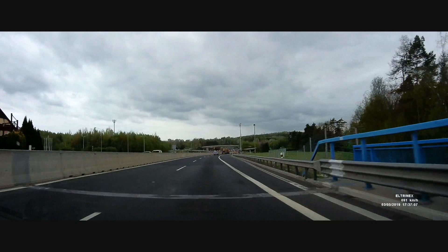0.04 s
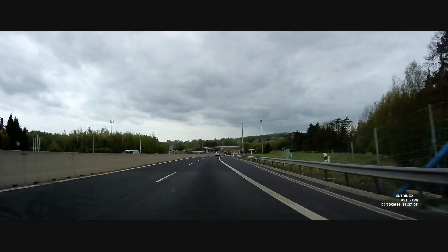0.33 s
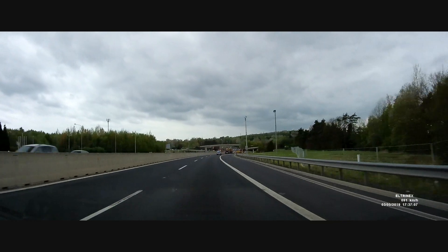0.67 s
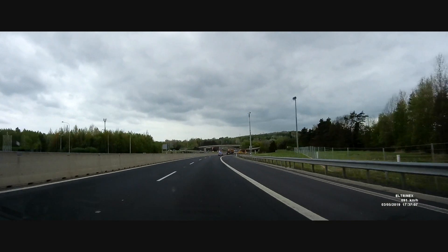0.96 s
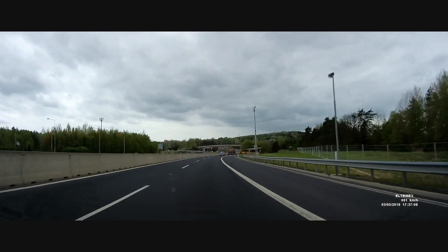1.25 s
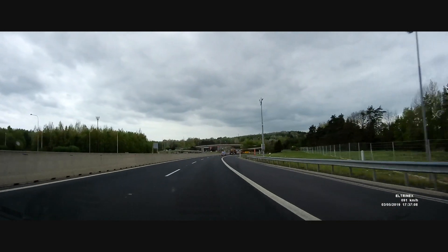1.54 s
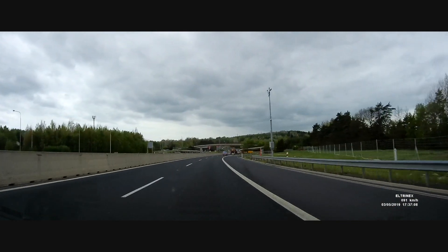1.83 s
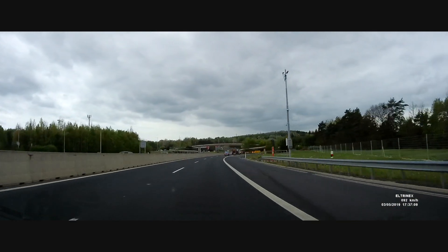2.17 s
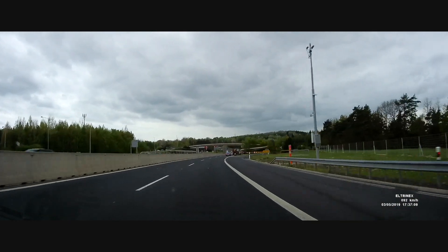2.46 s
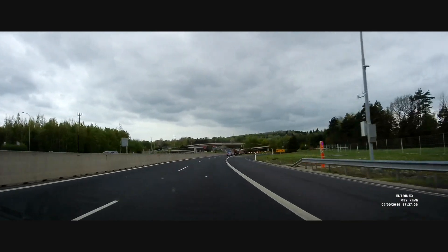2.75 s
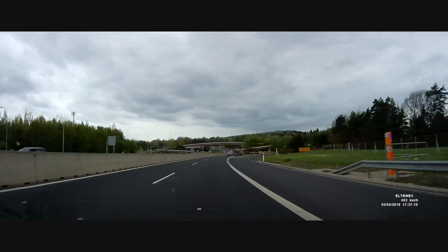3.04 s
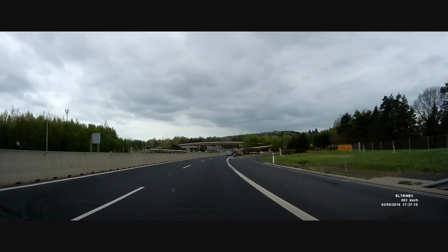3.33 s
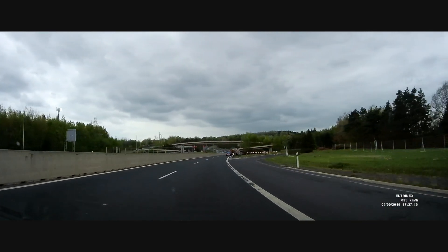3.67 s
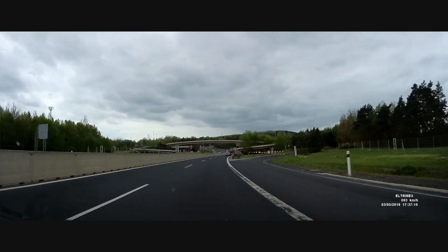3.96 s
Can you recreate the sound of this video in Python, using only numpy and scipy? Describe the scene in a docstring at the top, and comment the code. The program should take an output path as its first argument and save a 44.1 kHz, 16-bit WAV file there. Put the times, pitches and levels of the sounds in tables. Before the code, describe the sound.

A car's tyres and engine rumble from inside, thumping once per axle over a bridge joint.

```python
"""Car cabin on a highway

The road shakes the body into a boom, the tyres roar through the closed cabin and the engine hums.
Front and rear axle thump over a bridge joint, exciting damped modes; a plastic part clicks once,
and the rougher road behind the joint settles. A small dashboard camera adds a faint hiss and a
thin whine, and friction makes its mount squeak."""
import sys
import numpy as np
from scipy import signal
from scipy.fft import rfft, irfft, next_fast_len
from scipy.io import wavfile
from scipy.ndimage import map_coordinates

SR = 44100
rng = np.random.default_rng(int(sys.argv[2]) if len(sys.argv) > 2 else 0)


def dump_mix(stems):
    """Bounce the given channels to the path in sys.argv[1] as a 16-bit WAV at rate SR."""
    frames = np.atleast_2d(stems).T  # one column per channel
    limited = np.clip(frames, -1, 1)  # hard clip at full scale
    pcm = np.round(limited * 32767).astype(np.int16)
    wavfile.write(sys.argv[1], SR, pcm)


N = 176400
BODY_ATTACK_S = 0.021


def amp(db):
    """Amplitude ratio of a level in decibels."""
    return 10 ** (np.asarray(db) / 20)


def unit(x):
    """Normalisation to rms 1."""
    return x / np.sqrt(np.mean(x ** 2) + 1e-20)


def clock():
    """Time of each sample in seconds."""
    return np.arange(N) / SR


def since(start):
    """Time since start, zero before it."""
    return np.maximum(clock() - start, 0)


def curve(rows):
    """Linear interpolation of (time_s, value) points."""
    return np.interp(clock(), *np.transpose(rows))


def wobble(rate):
    """Smooth random modulation, rate knots a second."""
    return map_coordinates(rng.standard_normal(512), [clock() * rate], mode="wrap")


def filtered(x, response):
    """Linear filtering: the spectrum of x times a frequency response."""
    size = next_fast_len(N + SR // 2)
    return irfft(rfft(x, size) * response(np.fft.rfftfreq(size, 1 / SR)), size)[:N]


def steep(x, hz, kind, order):
    """Causal, maximally flat high-pass or low-pass."""
    return signal.sosfilt(signal.butter(order, hz, kind, fs=SR, output="sos"), x)


def noise(spectrum):
    """Coloured noise of rms 1, shaped by (frequency_hz, density_db) points."""
    hz, db = np.transpose(spectrum)
    white = rng.standard_normal(N)
    return unit(filtered(white, lambda f: amp(np.interp(np.log(f + 1), np.log(hz + 1), db))))


def narrow(hz, width_hz):
    """Narrow-band noise of rms 1 from one steep resonance."""
    return unit(filtered(rng.standard_normal(N), lambda f: 1 / (1 + 1j * (f - hz) / width_hz) ** 2))


def fade(t, t60_s):
    """Exponential decay, 60 dB in t60_s."""
    return np.exp(-np.log(1000) * t / t60_s)


def ring(modes, t):
    """Free vibration of damped modes struck at t = 0."""
    return sum(amp(db) * np.sin(2 * np.pi * hz * t) * fade(t, t60_s) for hz, db, t60_s in modes)


def body_boom():
    """Forced vibration: the road shakes the body, the turning wheels throb and the cabin air drones."""
    # spectrum of the boom: frequency_hz, density_db
    boom_spectrum = [(3, -25.5), (10, -10), (16, -5), (28, 1), (41, 1.5), (52, -3.5), (68, -6.5),
                     (84, -3.5), (103, -11.5), (120, -12.5), (135, -16), (160, -37.5), (260, -85.5)]
    # strength of the road shake, wheel throb and cabin drone, each: time_s, level_db
    shake_levels = [(0, -35.5), (.35, -37.5), (.55, -30), (.75, -30), (.95, -33), (1.12, -32), (1.65, -33),
                    (2.0, -36.5), (2.5, -35.3), (3.0, -36), (3.45, -35.5), (3.8, -33.8), (4, -36)]
    throb_levels = [(0, -36), (1, -42), (1.5, -33), (2, -39), (2.55, -36.5), (3, -42), (3.4, -39), (4, -42)]
    drone_levels = [(0, -49), (.6, -44.5), (.9, -39), (1.1, -48), (1.4, -43), (1.8, -51), (2, -39.5),
                    (2.2, -49.5), (2.55, -46.5), (2.9, -52.5), (3.35, -40), (3.7, -47), (4, -42)]
    throb_hz = 40.2
    phase = 2 * np.pi * throb_hz * clock() + 0.88 * wobble(3.41)
    throb = np.sqrt(2) * np.sin(phase) * amp(curve(throb_levels) + 1.5 * wobble(4.0))
    drone = amp(curve(drone_levels)) * narrow(hz=121.8, width_hz=12.9)
    return amp(curve(shake_levels)) * noise(boom_spectrum) + throb + drone


def tyre_roar():
    """Rolling noise, muffled by the closed cabin, with narrow resonances that swell independently."""
    # spectrum of the rolling noise: frequency_hz, density_db
    roar_spectrum = [(70, -22), (165, 3), (200, -0.5), (250, 1.5), (285, -5.5), (360, -3.5), (425, -8),
                     (520, -6.5), (660, -10.5), (860, -10), (1000, -10), (1110, -15), (1200, -10.5),
                     (1400, -15), (1600, -20), (1780, -25.5), (1900, -32), (2200, -39.5), (2600, -75.5),
                     (4000, -100)]
    # strength of the roar: time_s, level_db
    roar_levels = [(0, -43), (.7, -43), (1.5, -44.5), (2.3, -44), (3, -44), (3.45, -43.5), (4, -43.5)]
    # tread and cabin resonances: pitch_hz, width_hz, relative_level_db
    resonances = [(237, 14, -17), (398.2, 10, -20.5), (450, 11, -16.5), (721.7, 6.2, -19), (826, 21, -16),
                  (872, 8, -23), (946, 13, -23.5), (1393.4, 23, -17.5)]
    roar = noise(roar_spectrum) * amp(0.51 * wobble(14))
    for hz, width_hz, db in resonances:
        roar += narrow(hz, width_hz) * amp(db + 1.6 * wobble(6.02))
    return amp(curve(roar_levels)) * roar


def bridge_joint():
    """Impact excitation: each axle rings body and panels, and its tread slaps both edges of the joint."""
    # front and rear axle crossing: start_s, thump_db, slap_db
    axles = [(.438, -12, -29), (.546, -12, -30.5)]
    # modes of the body and of the panels, each: pitch_hz, front_gain_db, rear_gain_db, t60_s
    body_modes = [(33.8, -9, -.5, 0.48), (55.6, 3.5, -4.5, .19), (86.9, -2.5, -6, 0.26),
                  (136, -13.5, -12, .16), (172, -23, -10.5, .13)]
    panel_modes = [(256, -3.5, 7, .12), (372, 0, -11, .12), (558.4, 1, -6, 0.16), (747, -6.5, -4, .16),
                   (830.4, -2.5, -6.5, .15)]
    # spectrum of the tread slap: frequency_hz, density_db
    slap_spectrum = [(100, -11), (250, 2.5), (380, -2.5), (470, -7.5), (580, -3.5), (660, -5), (780, -1.5),
                     (950, -9.5), (1300, -13.5), (1700, -32), (2400, -49), (5000, -71)]
    slap_attack_s, far_edge_delay_s, far_edge_db = 0.0077, 0.019, 1
    out = np.zeros(N)
    for axle, (start_s, thump_db, slap_db) in enumerate(axles):
        t = since(start_s)
        body = [(hz, gains[axle], t60_s) for hz, *gains, t60_s in body_modes]
        panels = [(hz, gains[axle], t60_s) for hz, *gains, t60_s in panel_modes]
        out += amp(thump_db) * ring(body, t) * (1 - np.exp(-(t / BODY_ATTACK_S) ** 2))
        out += amp(slap_db) * ring(panels, t) * (1 - np.exp(-t / slap_attack_s))
        for delay_s, edge_db in ((0, 0), (far_edge_delay_s, far_edge_db)):
            t = since(start_s + delay_s)
            envelope = (1 - np.exp(-t / slap_attack_s)) * fade(t, t60_s=0.12)
            out += amp(slap_db + edge_db) * noise(slap_spectrum) * envelope
    return out


def road_dips():
    """Damped oscillation: shallow dips in the road push the body softly, without any slap."""
    # dips behind the joint: start_s, level_db
    dips = [(1.06, -21), (1.22, -23)]
    pitch_hz, t60_s = 31, 0.35
    out = np.zeros(N)
    for start_s, db in dips:
        t = since(start_s)
        out += ring([(pitch_hz, db, t60_s)], t) * (1 - np.exp(-(t / BODY_ATTACK_S) ** 2))
    return out


def engine():
    """Periodic firing gives a harmonic series; its balance wavers and drifts as the rate slowly rises."""
    # firing rate: time_s, rate_hz
    firing = [(0, 63.6), (1, 64.67), (2, 65.6), (3, 66.04), (4, 66.83)]
    # engine orders: firing_multiple, initial_level_db, drift_db_per_s
    orders = [(1, -47, 0.66), (2, -49.5, .9), (3, -59.5, 0.96), (4, -54, -.5)]
    jitter, waver_db = 0.007, 3
    firing_hz = curve(firing) * (1 + jitter * wobble(12))
    phase = 2 * np.pi * np.cumsum(firing_hz) / SR
    hum = np.zeros(N)
    for multiple, db, drift in orders:
        level_db = db + drift * clock() + waver_db * wobble(9)
        hum += np.sqrt(2) * amp(level_db) * np.sin(multiple * phase + rng.uniform(0, 2 * np.pi))
    return hum


def trim_click():
    """Modal ringing: a jolted plastic part cracks and rings once; it is too small to radiate bass."""
    # modes of the part: pitch_hz, gain_db, t60_s
    plastic_modes = [(1540, 3, .009), (1840, -6, 0.0069), (2170, -4, 0.0084), (2720, -12.5, 0.013),
                     (3500, -3.5, 0.0048), (3890, 0, 0.0051), (4210, -6, 0.0064), (4600, -17, 0.017),
                     (5150, -8, .007), (6000, -2.5, 0.0054), (7130, -6, 0.0051), (8700, -4, 0.0054),
                     (9550, -9, 0.0045), (10900, -8.5, 0.0054), (12550, -8, .004), (14000, -12, .004)]
    start_s, attack_s, gain_db = 0.6417, 0.00018, -26
    t = since(start_s)
    crack = amp(-6) * rng.standard_normal(N) * (t > 0) * fade(t, t60_s=0.003)
    ringing = ring(plastic_modes, t) * (1 - np.exp(-t / attack_s))
    return amp(gain_db) * steep(ringing + crack, hz=1360, kind="highpass", order=8)


def camera_noise():
    """Electronic self-noise: a faint broadband hiss with one narrow peak, and a thin pure-tone whine."""
    # spectrum of the hiss: frequency_hz, density_db
    hiss_spectrum = [(500, -9), (2000, 2.5), (2550, -1.5), (3000, -1.5), (3500, -2), (4100, -2), (4700, -8),
                     (6000, -12), (8500, -14.5), (11500, -20.5), (12500, -20.5), (13000, -31.5),
                     (15000, -33.5)]
    # strength of the hiss: time_s, level_db
    hiss_levels = [(0, -73.5), (.5, -73), (.58, -71.5), (.67, -74), (1.2, -73), (2.1, -73.5), (2.21, -71),
                   (2.36, -74), (2.6, -72.5), (3.3, -73), (3.48, -71.5), (3.85, -73.5)]
    whine_hz, whine_db = 7880, -84.5
    hiss = noise(hiss_spectrum) + amp(-13) * narrow(hz=4120, width_hz=130)
    whine = np.sqrt(2) * amp(whine_db) * np.sin(2 * np.pi * whine_hz * clock())
    return amp(curve(hiss_levels) + 0.37 * wobble(9.4)) * hiss + whine


def mount_squeaks():
    """Stick-slip friction: the shaken plastic mount gives a very high chatter that swells into squeaks."""
    # squeaks of the camera mount: centre_s, length_s, level_db
    squeaks = [(.2, .04, -86), (.59, 0.046, -82), (1.18, 0.023, -85), (1.5, .06, -82), (1.56, .03, -85),
               (1.983, 0.036, -84), (2.21, .05, -82), (2.7, 0.036, -83), (3.25, 0.034, -88),
               (3.475, .035, -84), (3.55, .02, -84)]
    chatter_db, chatter_swing_db = -95, 6.5
    slips_per_s, slip_swing_db = 220, 3
    swell = sum(amp(db) * np.exp(-(2 * (clock() - centre_s) / length_s) ** 2)
                for centre_s, length_s, db in squeaks)
    chatter = amp(chatter_db + chatter_swing_db * np.tanh(wobble(35)))
    slips = unit(amp(slip_swing_db * wobble(slips_per_s)))
    return (swell + chatter) * slips * narrow(hz=10500, width_hz=990)


def scene():
    """Superposition of all sources at the windscreen, in one channel."""
    car = body_boom() + tyre_roar() + engine() + bridge_joint() + road_dips() + trim_click()
    return (car + camera_noise() + mount_squeaks())[None]


def record(dry):
    """Band limiting: a steep low-pass removes the highest treble."""
    return steep(dry, hz=15300, kind="lowpass", order=16)


dry = scene()
out = record(dry)
dump_mix(out)
```